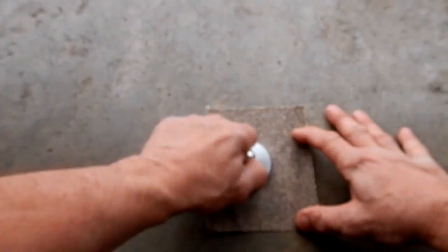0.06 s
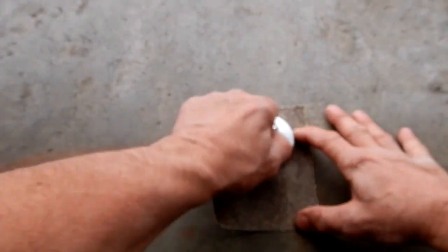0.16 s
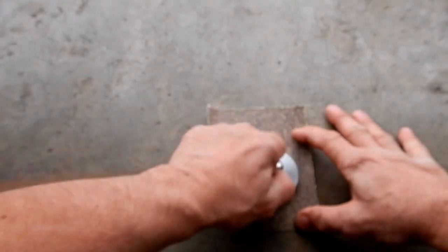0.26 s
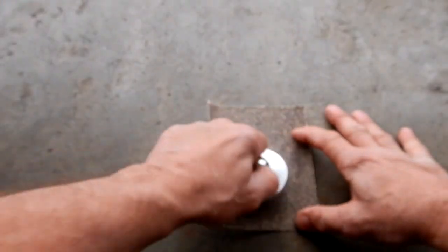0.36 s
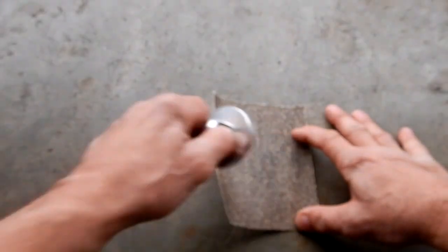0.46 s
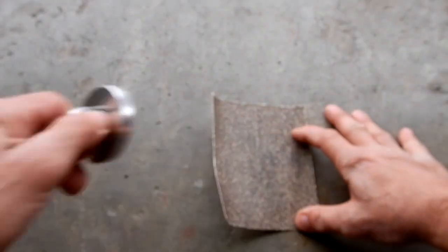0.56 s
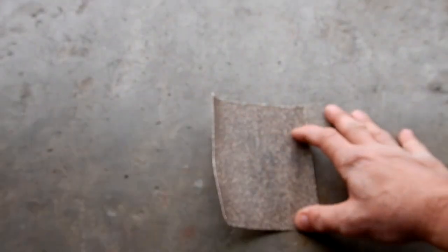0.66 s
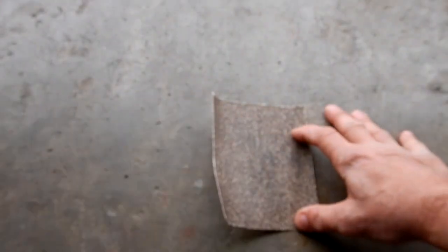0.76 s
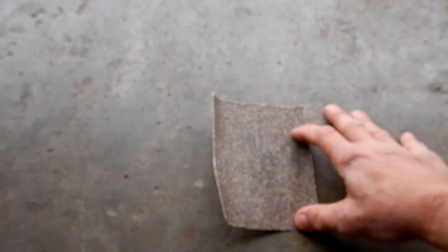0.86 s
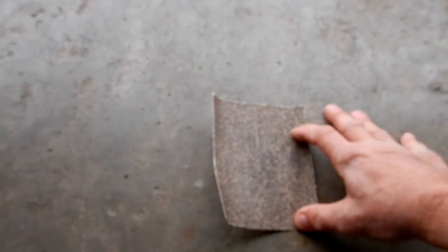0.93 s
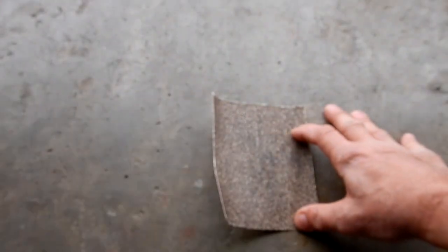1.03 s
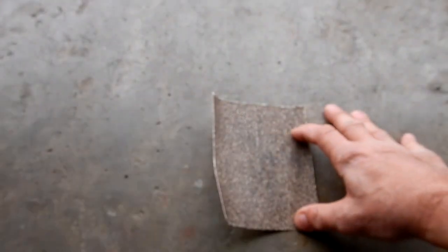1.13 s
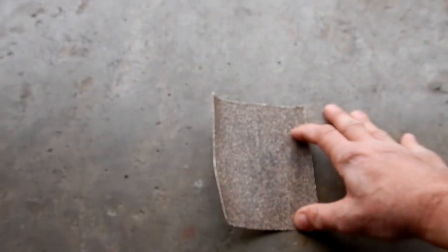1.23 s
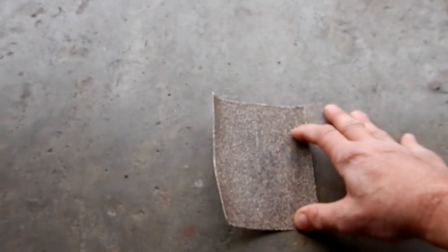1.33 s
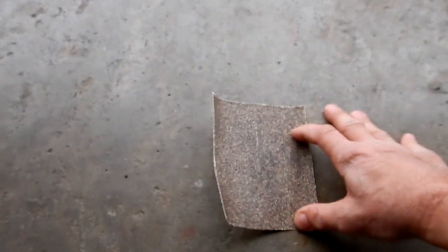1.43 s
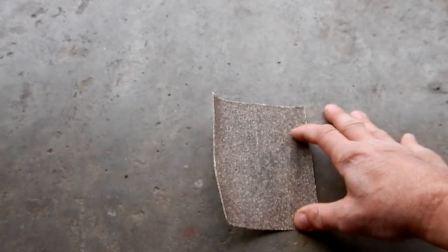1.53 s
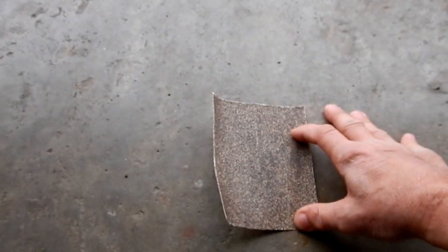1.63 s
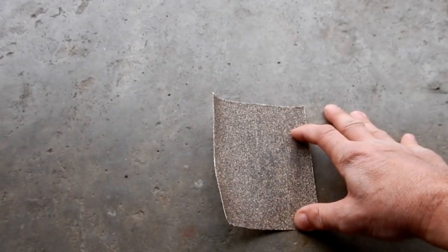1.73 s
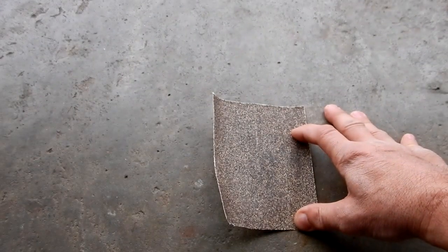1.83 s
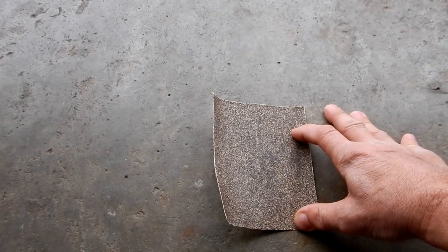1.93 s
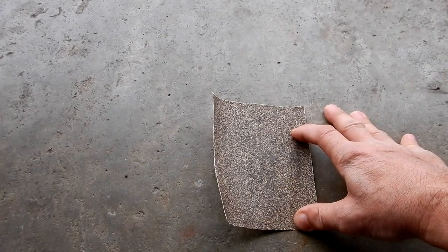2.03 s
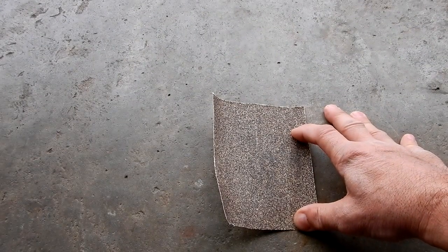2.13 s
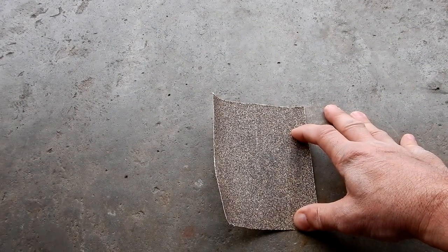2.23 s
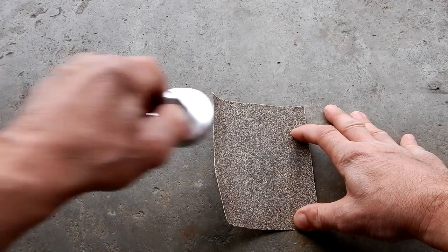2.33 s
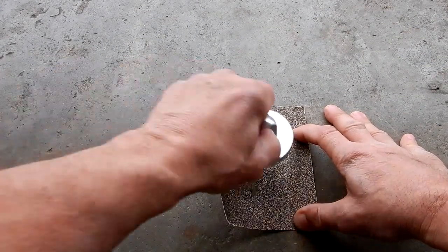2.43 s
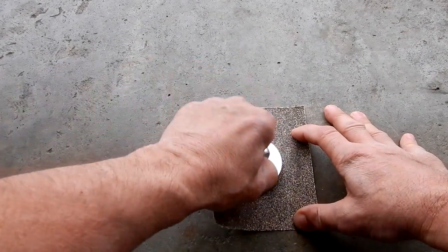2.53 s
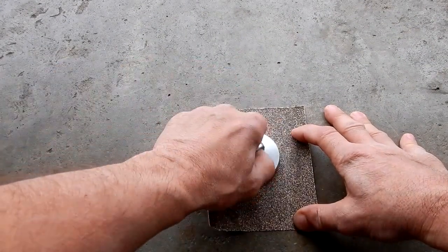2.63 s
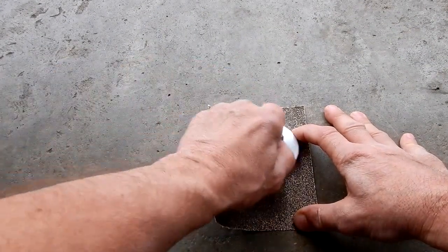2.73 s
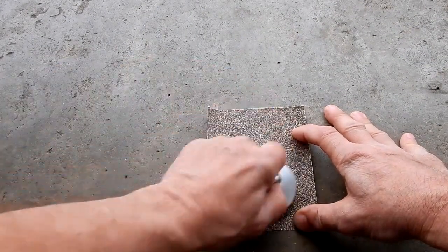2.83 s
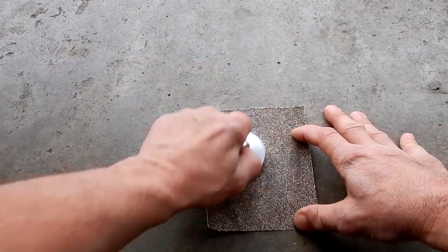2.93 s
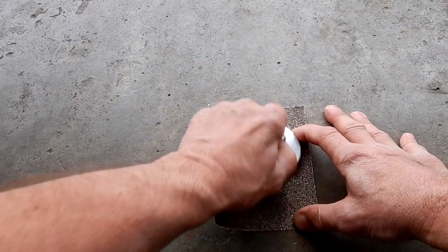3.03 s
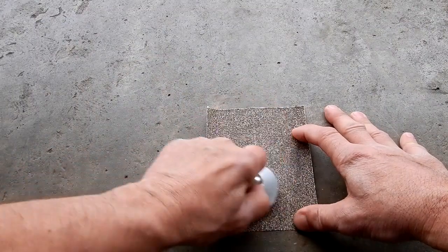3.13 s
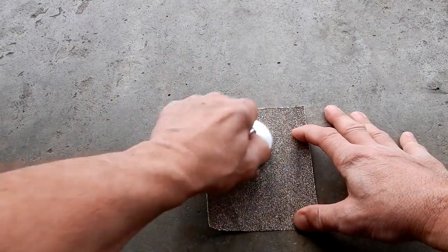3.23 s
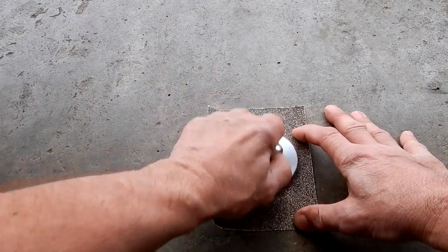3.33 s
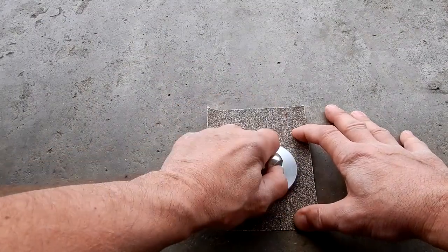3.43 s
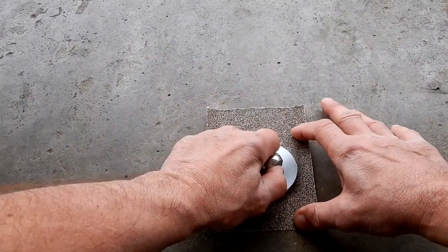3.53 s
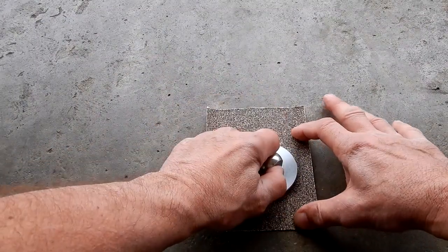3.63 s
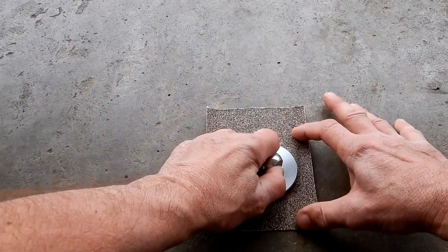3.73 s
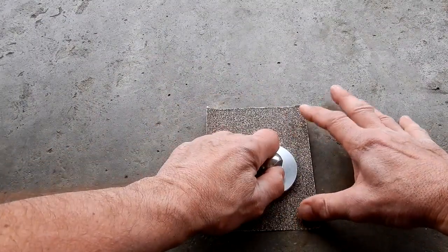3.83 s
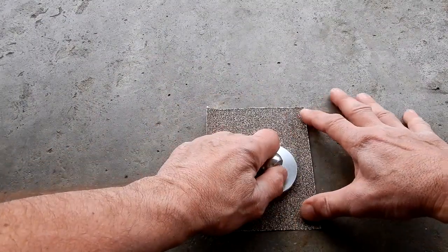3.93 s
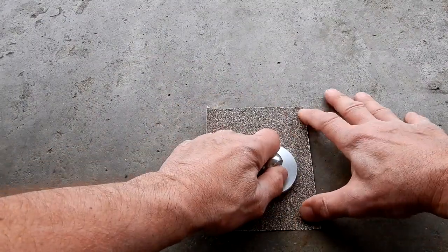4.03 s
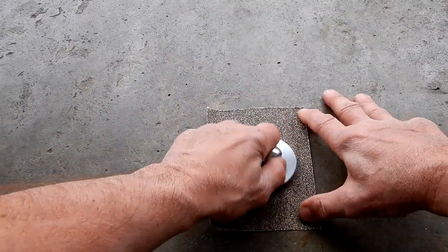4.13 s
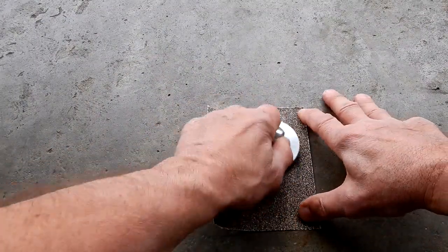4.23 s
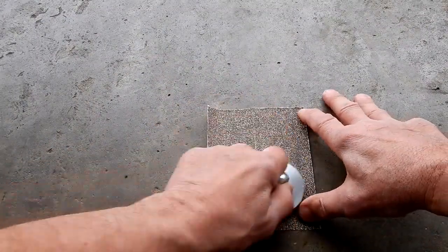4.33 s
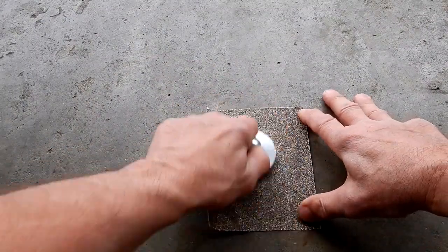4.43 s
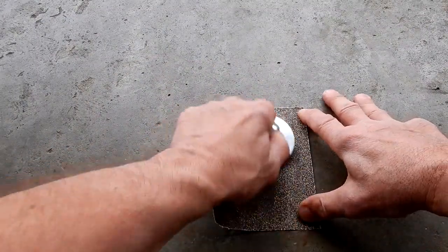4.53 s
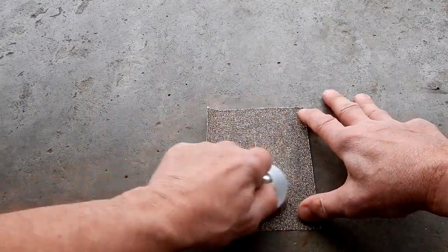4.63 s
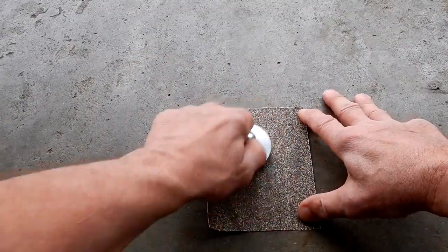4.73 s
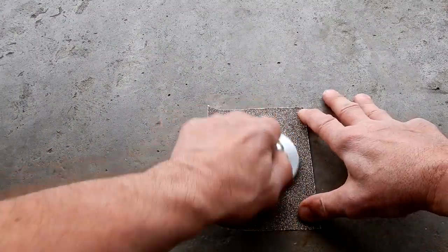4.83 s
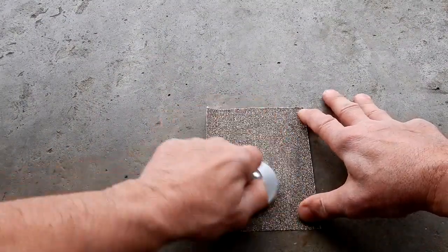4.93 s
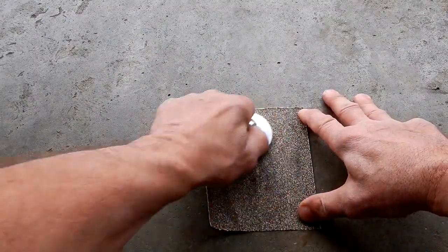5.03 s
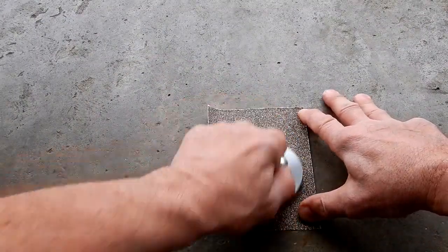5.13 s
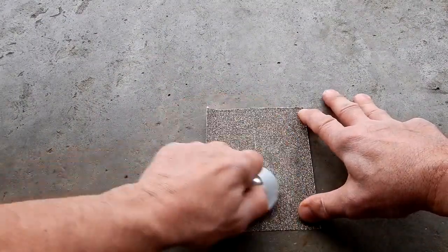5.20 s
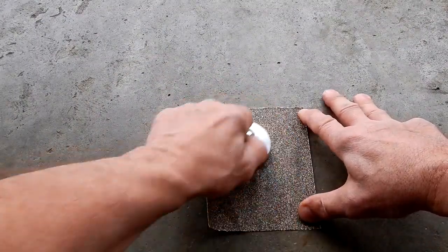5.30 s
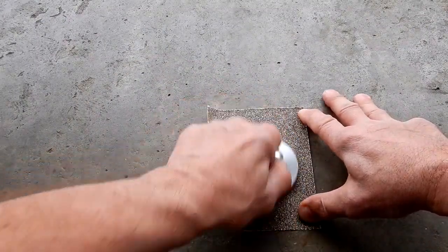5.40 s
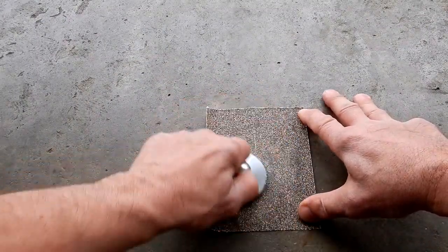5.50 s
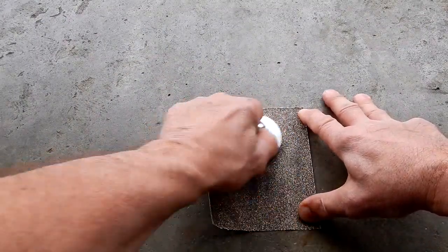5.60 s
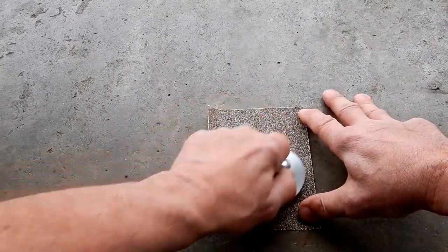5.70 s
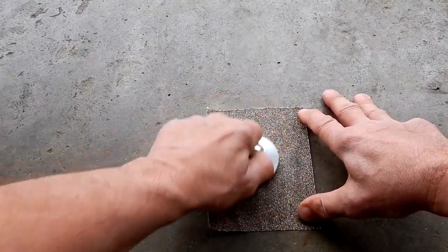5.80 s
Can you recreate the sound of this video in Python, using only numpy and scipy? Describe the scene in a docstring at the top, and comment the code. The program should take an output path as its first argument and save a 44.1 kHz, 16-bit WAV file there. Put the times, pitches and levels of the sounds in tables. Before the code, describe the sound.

Close stereo sound in a quiet workshop with a short, faint room echo. Rough metal-on-sandpaper scratching is already under way at 0 s: quick uneven strokes, five to ten a second, dense and gritty, strongest in the bright upper mids, with fine hiss and little bass. It weakens around 0.5 s and ends with two sharp bright metal clacks at 0.52-0.54 s and a weaker tap at 0.65. Then low, soft air with a faint hum slowly creeps up; a small dull knock comes at 1.49 and a barely audible tick near 2.18. At 2.74-2.80 a rattling cluster of knocks sets the foot down, and scratching resumes until about 3.64, with snaps of grit. A light tap at 3.73 and faint paper ticks and a tiny slide around 3.8-4.3 fill the pause. From 4.34 vigorous scraping runs almost continuously, swelling and dipping with each stroke, until about 5.97 s.

```python
"""Metal foot rubbed on sandpaper

A metal foot is rubbed by hand on coarse sandpaper on a concrete floor, in three bouts.
Thousands of grit tips a second catch the metal and ring its hand-damped resonances.
In the pauses the foot knocks down and the sheet ticks, over the quiet air of a workshop.
Each stroke is one arch of hand speed, which sets how loud the scrape is and how much grit it meets.
The recorder turns the rubbing down and lets the air back slowly."""
import sys
import numpy as np
from scipy import signal
from scipy.fft import rfft, irfft, next_fast_len
from scipy.io import wavfile

SR = 44100
rng = np.random.default_rng(int(sys.argv[2]) if len(sys.argv) > 2 else 0)


def pcm_store(signal):
    """Save signal as 16-bit PCM."""
    levels = np.round(np.clip(np.atleast_2d(signal), -1, 1) * 32767)
    wavfile.write(sys.argv[1], SR, levels.astype(np.int16).T)


N = 258426  # length in samples
TIME = np.arange(N) / SR
HZ = np.fft.rfftfreq(4096, 1 / SR)  # the frequencies on which filters are drawn
FULL_DB = -10  # strength of a firm stroke


# Fine hiss of the grit tips. Each row: frequency in Hz, level in dB per Hz.
HISS_COLOUR = [(2000, -37), (5000, 5), (6700, 2.5), (7700, -2.5), (9000, -1.5), (11000, -7.5), (12500, -5),
               (13900, -12), (14700, -18), (15400, -55)]
# The sheet and floor grinding under the foot. Each row: frequency in Hz, level in dB per Hz.
GRIND_COLOUR = [(25, -43.5), (150, -37.5), (400, -13.5), (600, -6.5), (800, -1), (1050, 1.5), (1400, 0),
                (1900, 6), (2700, 5.5), (4000, -20), (8000, -31.5)]
# Balance of the rubbing. Each row: frequency in Hz, left minus right in dB.
RUBBING_BALANCE = [(1900, -0.44), (2500, -1.4), (3100, 1.7), (3800, -2.5), (4900, 2.5), (5600, 1.8),
                   (6400, -2), (7600, -2.5), (11000, -0.5), (14000, 0.5)]
GRIT_PER_S = 7000  # grit catches a second, before the hand's effort scales it
GRIND_POWER = 0.57  # grind and bumps depend more on weight than on speed, so they follow effort only this far
RING_DB, HISS_DB, GRIND_DB, BUMP_DB = -2.74, -10.5, -19.0, -44
FLICKER_DB, FLICKER_HZ = 1.5, 90  # the hiss and the grind flicker, each on its own
JUDDER_DB, JUDDER_HZ = 0.76, 190
SURGE_DB, SURGE_HZ = 0.1, 60


def rubbing():
    """Faster strokes meet more grit; the same clicks drive the foot, the sheet and a fine hiss."""
    strength, bright_db, press_db = hand()
    effort = strength / amp(FULL_DB)
    weight = amp(press_db) * effort ** GRIND_POWER
    clicks = grit(GRIT_PER_S * (0.33 + np.sqrt(effort)), spread_db=1.33)
    ring = amp(RING_DB) * foot(clicks, bright_db, wander_db=3.0, wander_hz=56.1)

    heard = ports(clicks)
    hiss_level = amp(HISS_DB + bright_db + FLICKER_DB * drift(FLICKER_HZ))
    hiss = hiss_level * unit(colour(heard, amp(read(HISS_COLOUR))))
    grind_level = amp(FULL_DB + GRIND_DB + FLICKER_DB * drift(FLICKER_HZ))
    grind = grind_level * unit(colour(heard, amp(read(GRIND_COLOUR))))

    # the foot sticks and slips on uneven grit
    judder = amp(JUDDER_DB * drift(JUDDER_HZ) + SURGE_DB * drift(SURGE_HZ))
    scrape = ((ring + hiss) * strength + grind * weight) * judder
    return lean(scrape + amp(BUMP_DB) * weight * low_bumps(), RUBBING_BALANCE)


# Strokes of the hand, overlapping where it loops round without stopping.
# Each row: start in seconds, length in seconds, strength in dB, fastest moment as a share 0-1 of the length,
# brightness in dB (drops when the foot rides on its rim), weight on the sheet in dB.
HAND_STROKES = [ (-.074, .215, -12, 0.4, 1.5, 1), (0.038, 0.14, -10.5, .54, -2, 4),
                (0.129, .092, -10.5, 0.65, 0.5, -1), (0.194, 0.13, -14, 0.3, 3.5, 5),
                (.249, 0.22, -10, 0.37, -2.5, 0), (.397, 0.13, -14, 0.53, -1, -1),
                (.492, 0.11, -23, 0.23, -0.5, 0.5), (.568, 0.086, -32, 0.8, -11.5, 6),
                (2.788, 0.087, -28, 0.7, -14.5, -5), (2.837, .164, -10.5, 0.49, -7, -3),
                (2.892, 0.23, -9.5, 0.58, 1.5, 3), (3.056, .109, -10, 0.57, 1.5, 1),
                (3.137, 0.23, -10, .28, -1, -1.5), (3.283, .127, -14, .23, 6, 4.5),
                (3.328, 0.25, -10.5, 0.48, 1, 0), (3.528, 0.11, -15.5, 0.32, 3, 2.5),
                (4.339, 0.12, -9.5, 0.63, 1, -1.5), (4.444, 0.14, -8.5, 0.62, 1.2, 1),
                (4.568, 0.22, -10.5, 0.41, 1.5, 1.5), (4.766, 0.13, -10.5, 0.3, 0.5, 1),
                (4.834, 0.36, -12.5, 0.34, 1, -0.5), (5.036, .118, -10.5, .3, -0.5, 1.5),
                (5.117, 0.2, -10, 0.5, 0.5, 0), (5.277, 0.28, -10.5, 0.13, 0.4, 0),
                (5.372, 0.21, -11, 0.72, 1.5, -0.5), (5.519, 0.17, -8.5, .61, -1.5, 2),
                (5.641, 0.11, -11, .48, 2, 2), (5.703, .267, -10.5, .51, -0.5, 0.5)]
SPEED_POWER = 0.95  # the scrape grows as the hand's speed to this power


def hand():
    """Each stroke speeds up and slows in one arch; gives strength, brightness and weight over time."""
    power, bright, press = np.zeros((3, N))
    for start, length, db, fastest, bright_db, press_db in HAND_STROKES:
        # bend time so that the top of the arch falls at the fastest moment
        bend = np.log(0.5) / np.log(np.clip(fastest, 0.1, 0.9))
        way = np.clip((TIME - start) / length, 0, 1) ** bend
        speed = abs(np.sin(np.pi * way))
        part = (amp(db) * speed ** SPEED_POWER) ** 2
        power += part
        bright += part * bright_db
        press += part * press_db
    # where strokes overlap, the stronger one decides more
    return np.sqrt(power), bright / (power + 1e-12), press / (power + 1e-12)


def grit(per_s, spread_db):
    """Two unrelated trains of clicks from grit tips catching and breaking free: many small, few large."""
    size = amp(spread_db * np.minimum(rng.exponential(1, (2, N)), 4.5))
    sign = rng.choice([-1, 1], (2, N))
    caught = rng.random((2, N)) < per_s / SR
    return size * sign * caught


# Resonances of the held foot. Each row: frequency in Hz, width in Hz, level in dB.
FOOT_MODES = [(1780, 38, -10), (2400, 73, -11.5), (3430, 1000, 1), (3593, 450, 3.5), (4386, 200, 7),
              (4772, 310, 9), (5267, 200, 5.5), (5980, 350, -25), (6000, 500, -5)]
RIM_TILT = 0.93  # on the rim the lower resonances take over: dB per octave for each dB of brightness


def foot(clicks, bright_db, wander_db, wander_hz):
    """The foot's resonances; each swells and fades as the point of contact moves."""
    out = np.zeros((2, N))
    for hz, width, db in FOOT_MODES:
        b, a = signal.iirpeak(hz, hz / width, fs=SR)
        reach = rng.uniform(-0.88, 1, N)  # where a tip touches decides how hard it drives this mode
        tilt_db = RIM_TILT * bright_db * np.log2(hz / 4200)
        level = amp(db + tilt_db + wander_db * drift(wander_hz))
        out += level * signal.lfilter(b, a, clicks * reach)
    # thin out the bass below 1800 Hz and the treble above 7500 Hz
    less_bass = 1 / np.hypot(1, (1800 / (HZ + 1)) ** 2)
    less_treble = 1 / np.hypot(1, (HZ / 7500) ** 3)
    return unit(colour(ports(out), less_bass * less_treble))


# Sparse low bumps under the rubbing. Each row: frequency in Hz, level in dB per Hz.
BUMP_COLOUR = [(25, -15), (70, -6), (150, -4.5), (380, 5.5), (600, -0.5), (1000, -18), (3000, -32.5)]


def low_bumps(per_s=50, spread_db=3.1):
    """Uneven low bumps, about 50 a second at a wandering rate; they grow with the weight on the sheet."""
    rate = per_s * amp(5 * drift(90))
    beats = np.diff(np.floor(np.cumsum(rate) / SR), prepend=0)  # one beat at each whole count
    size = amp(spread_db * rng.standard_normal(N))
    bumps = ports(beats * rng.choice([-1, 1], (2, N)) * size)
    return unit(colour(bumps, amp(read(BUMP_COLOUR))))


# Knocks of the metal; rows at almost the same time are the dull and bright parts of one knock.
# Each row: time in seconds, peak in dB, centre of the blow in Hz, spread in octaves, chatter time in seconds.
KNOCK_BLOWS = [(0.5232, -4.5, 3800, 0.58, .0025), (0.5384, 0.5, 5300, 0.4, 0.0016),
               (0.6494, -18.5, 2250, 0.54, 0.003), (1.4879, -11, 1410, 0.22, 0.0023),
               (1.4879, -17.5, 2650, 0.24, 0.0026), (1.4883, -25, 5000, 0.16, .002),
               (2.7400, -10.5, 1560, 1.06, .0031), (2.7475, -18.5, 2400, 1.2, .002),
               (2.7577, -1.5, 2270, 0.63, .0023), (2.7694, -7, 2700, .35, .002),
               (2.7742, -8.5, 3000, 0.88, .002), (2.7820, -6.5, 2860, 0.52, .0012),
               (2.7960, -9, 4200, .7, .0013), (3.725, -19, 1450, 0.88, 0.00032)]
# What a knock rings with. Each row: frequency in Hz, level in dB, time to fall 60 dB in seconds
# (it sets how narrow the resonance is).
KNOCK_RING = [(1036, -14, 0.053), (1380, -21, 0.033), (1980, 0.5, 0.051), (2300, -6, 0.016),
              (2980, -3, 0.046), (4620, 5, 0.1), (5110, -9.5, 0.07)]


def knocks(dead_db=-5):
    """Each blow is a short push through the metal's damped modes, over an even part that does not ring."""
    out = np.zeros((2, N))
    modes = amp(dead_db)
    for hz, db, t60 in KNOCK_RING:
        modes = modes + amp(db) / np.hypot(1, (HZ - hz) * t60 / 1.6)
    # overall tone of the knocks: Hz, dB
    tone = [(300, -3.5), (1000, 1.5), (3800, -3.5), (5300, -1.5), (6800, -12), (14000, -16.5)]
    body = modes * amp(read(tone))
    for s, db, hz, octaves, seconds in KNOCK_BLOWS:
        blow = colour(contact(seconds, share=1.0), body * bell(hz, octaves, skirt=0.61))
        add(out, s, amp(db) * blow / abs(blow).max())
    return out


# Snaps of grit and of the shifting sheet.
# Each row: time in seconds, peak in dB, centre in Hz, spread in octaves, crackle time in seconds.
SHEET_SNAPS = [(0.2474, 3, 5250, 0.23, 0.00076), (.5238, -6, 8000, 0.56, .004),
               (2.184, -37, 404, 0.62, 0.014), (2.182, -35.5, 2300, 0.76, 0.01),
               (2.8268, -13.5, 4100, .25, .003), (2.865, -10.5, 3280, .19, .012),
               (3.1138, 3, 4050, 0.24, 0.0064), (3.585, -0.5, 4760, 0.26, 0.0032),
               (3.8338, -29.5, 6740, 0.6, .0016), (3.848, -36, 7960, 0.69, 0.0024),
               (4.0158, -28, 5120, 0.074, 0.0038), (4.0195, -19, 3760, 0.71, 0.0035),
               (4.164, -42, 5900, 0.97, .002), (4.2132, -26, 3240, 0.38, 0.0033),
               (4.213, -36.5, 6800, 0.42, 0.0015), (4.289, -39.5, 4180, 0.25, .006),
               (4.367, -9.5, 3450, 0.25, 0.007), (4.4405, 0, 5240, 0.33, 0.00092),
               (4.779, -4.5, 4020, 0.35, 0.0024)]
# the fingers nudge the sheet, which slides and comes to rest
SLIDE_S, SLIDE_RISE_S, SLIDE_DB, SLIDE_FADE_DB_PER_S = 4.025, 0.034, -49, 127


def sheet():
    """Grit snaps, and the stiff paper ticks and slides as the grip changes."""
    age = np.maximum(TIME - SLIDE_S, 0)
    rise = np.minimum(age / SLIDE_RISE_S, 1)
    fade = amp(SLIDE_DB - SLIDE_FADE_DB_PER_S * np.maximum(age - SLIDE_RISE_S, 0))
    rustle = unit(colour(ports(grit(2500, spread_db=4)), bell(4400, 0.3, skirt=0.53)))
    out = rise * fade * rustle
    for s, db, hz, octaves, seconds in SHEET_SNAPS:
        snap = colour(contact(seconds, share=1.5), bell(hz, octaves, skirt=0.98))
        add(out, s, amp(db) * snap / abs(snap).max())
    return out


def contact(seconds, share):
    """One sharp click together with a dying chatter of small ones."""
    t = TIME[:len(HZ) * 2]
    chatter = ports(rng.standard_normal((2, len(t)))) * np.exp(-t / seconds)
    return (t == 0) + share * chatter / np.linalg.norm(chatter[0])


def bell(hz, octaves, skirt):
    """A broad hump round hz, with gently falling skirts; a larger skirt number falls faster."""
    return (1 + (np.log2((HZ + 20) / hz) / octaves) ** 2 / 2) ** (-2 * skirt)


# Throwback from near surfaces. Each row: delay at the left in seconds, delay at the right in seconds, level in dB.
NEAR_ECHOES = [(.0022, 0.00223, -16), (.0056, .0055, -25), (.0071, 0.0077, -11.5), (.0099, .0098, -14.5),
               (0.014, 0.014, -27)]


def near_echoes(x):
    """Floor, hands and nearby things throw each knock back within a few milliseconds."""
    taps = np.zeros((2, len(HZ)))
    for left, right, db in NEAR_ECHOES:
        taps[[0, 1], [round(left * SR), round(right * SR)]] += amp(db)
    return signal.oaconvolve(x, taps, axes=1)[:, :N]


# Likeness of the two microphones for sound from all round the workshop, for the air and the room.
# Each row: frequency in Hz, likeness 0-1.
DIFFUSE_LIKENESS = [(150, .94), (500, 0.77), (780, 0), (1000, .82), (1450, 1), (1750, 0.5), (2300, 0.7),
                    (3200, 0.6), (4000, 0)]
# How fast the room's echo dies. Each row: frequency in Hz, time to fall 60 dB in seconds.
ROOM_DECAY = [(200, 0.62), (1500, 0.25), (5000, 0.28), (12000, 0.071)]


def room(x):
    """A faint diffuse tail, each band dying at its own speed."""
    noise = ports(rng.standard_normal((2, SR // 2)), DIFFUSE_LIKENESS)
    hz, t, bands = signal.stft(noise, SR, nperseg=256)
    decay = amp(-60 * t / read(ROOM_DECAY, hz)[:, None])
    onset = np.minimum(t / 0.0028, 1)
    tail = signal.istft(bands * decay * onset, SR, nperseg=256)[1]
    return signal.oaconvolve(x, tail / np.linalg.norm(tail[0]), axes=1)[:, :N]


# Colour of the air. Each row: frequency in Hz, level in dB per Hz.
AIR_COLOUR = [(30, -22.5), (90, -21), (170, 1.5), (240, 2.5), (350, -3), (720, -6), (900, -3), (1130, -4.5),
              (1300, -13.5), (1750, -4.5), (2400, -10), (3800, -17), (5000, -17), (7500, -27.5),
              (15500, -28.5)]
# Balance of the air. Each row: frequency in Hz, left minus right in dB.
AIR_BALANCE = [(650, 0), (900, -6.5), (1500, 5.5), (1800, 0.5), (2100, 3), (2950, 8), (3500, 0), (4600, -2),
               (6500, -0.5)]
# Steady tones, a low hum and a faint whine. Each row: frequency in Hz, level in dB against the air.
AIR_TONES = [(151, -14), (6000, -30)]
AIR_DB = -51.5  # level of the workshop air
# the air swells softly around the time the foot comes back to the sheet
SWELL_S, SWELL_WIDTH_S, SWELL_DB = 2.834, 0.22, 7.5


def air():
    """Steady workshop air, shaped from noise, with a low hum, a faint whine and one soft swell."""
    noise = ports(rng.standard_normal((2, N)), DIFFUSE_LIKENESS)
    noise = unit(colour(noise, amp(read(AIR_COLOUR))))
    tones = sum(amp(db) * np.sin(2 * np.pi * hz * TIME) for hz, db in AIR_TONES)
    swell = amp(SWELL_DB * np.exp(-((TIME - SWELL_S) / SWELL_WIDTH_S) ** 2))
    return amp(AIR_DB) * (swell * lean(noise, AIR_BALANCE) + tones)


# Likeness of the two microphones for the near sounds. Each row: frequency in Hz, likeness 0-1.
NEAR_LIKENESS = [(100, .66), (600, 0.84), (1600, 0.97), (4000, 0.92), (5500, 0.83), (8000, 0.6),
                 (11000, .54), (14000, 0.4)]


def ports(pair, likeness=NEAR_LIKENESS):
    """Turns two unrelated signals into two microphones, as alike in each band as the table says."""
    size = next_fast_len(pair.shape[1])
    same = np.clip(read(likeness, np.fft.rfftfreq(size, 1 / SR)), 0, 1)
    mid, side = rfft(pair, size) * np.sqrt([(1 + same) / 2, (1 - same) / 2])
    return irfft(np.array([mid + side, mid - side]), size)[:, :pair.shape[1]]


def lean(x, balance):
    """Each microphone hears some bands better than the other does."""
    size = next_fast_len(N)
    lean_db = read(balance, np.fft.rfftfreq(size, 1 / SR)) / 2
    return irfft(rfft(x, size) * amp([lean_db, -lean_db]), size)[:, :N]


def colour(x, gain):
    """Filter with the shape of gain on HZ that never sounds early: sharp attack, ringing after."""
    log_gain = np.log(np.maximum(gain / gain.max(), 1e-5))
    mirrored = np.r_[log_gain, log_gain[-2:0:-1]]
    # minimum phase: the energy comes as early as this spectrum allows
    taps = np.fft.ifft(np.exp(np.conj(signal.hilbert(mirrored)))).real
    return signal.oaconvolve(x, taps[None, :len(HZ)], axes=1)[:, :x.shape[1]]


def drift(hz):
    """Slow chance of rms 1, heading for hz new random values a second."""
    knots = rng.standard_normal(N // 8)
    return unit(np.interp(TIME * hz, np.arange(len(knots)), knots))


def smooth(x, seconds):
    """Follows x with a lag."""
    keep = np.exp(-1 / (seconds * SR))
    return signal.lfilter([1 - keep], [1, -keep], x)


def amp(db):
    """Decibels to gain."""
    return 10 ** (np.asarray(db) / 20)


def unit(x):
    """Scales to rms 1."""
    return x / np.sqrt(np.mean(x ** 2) + 1e-20)


def read(points, hz=HZ):
    """Reads a table of (Hz, value) at any frequency, on a log-frequency axis."""
    f, value = np.transpose(points)
    return np.interp(np.log(hz + 1), np.log(f + 1), value)


def add(mix, s, sound):
    """Mixes a stereo sound in at time s."""
    part = mix[:, round(s * SR):][:, :sound.shape[-1]]
    part += sound[..., :part.shape[-1]]


def scene():
    """Rubbing, knocks and paper in the workshop."""
    scratch = rubbing() + sheet()
    blows = knocks()
    blows = blows + near_echoes(blows)
    tail = room(amp(-18.5) * scratch + amp(-16.5) * blows)
    return scratch + blows + tail + air()


# the recorder's gain control turns loud sound down by a limited amount and recovers slowly
THRESHOLD_DB, MOST_DUCK_DB, RECOVER_DB_PER_S = -27.5, 8.5, 18
SQUEEZE = 0.81  # dB turned down for each dB above the threshold
SENSE_S, ATTACK_S = 0.04, 0.012  # lag in sensing the level, lag in moving the gain
EDGE_HZ = 15750  # nothing much is kept above this


def record(dry):
    """Gain control ducks under loud sound and lets the air creep back in the pauses; then the band limit."""
    level_db = 10 * np.log10(smooth((dry ** 2).mean(0), SENSE_S) + 1e-12)
    over_db = np.clip(SQUEEZE * (level_db - THRESHOLD_DB), 0, MOST_DUCK_DB)
    over_db[0] = MOST_DUCK_DB  # the rubbing is already under way
    # hold the deepest duck so far, let go at a steady rate
    recovery = RECOVER_DB_PER_S * TIME
    held_db = np.maximum.accumulate(over_db + recovery) - recovery
    duck_db = MOST_DUCK_DB + smooth(held_db - MOST_DUCK_DB, ATTACK_S)
    ducked = dry / amp(duck_db)
    band_limit = signal.firwin(511, EDGE_HZ, window=("kaiser", 9), fs=SR)
    return signal.oaconvolve(ducked, band_limit[None], "same")


dry = scene()
out = record(dry)
pcm_store(out)
```